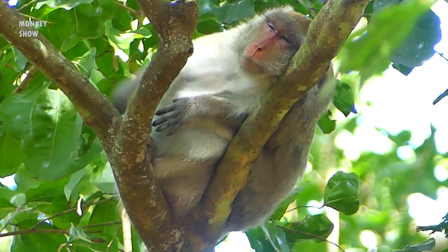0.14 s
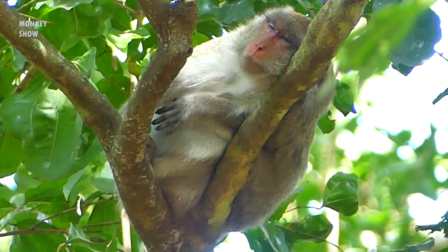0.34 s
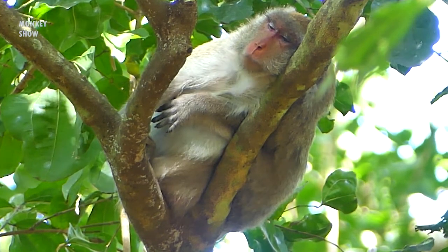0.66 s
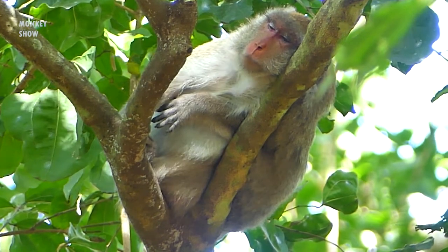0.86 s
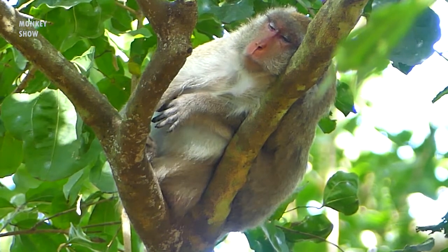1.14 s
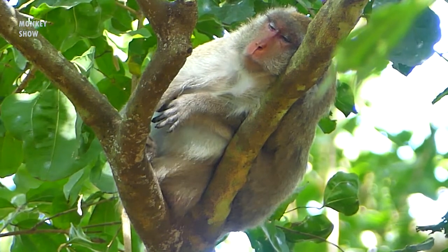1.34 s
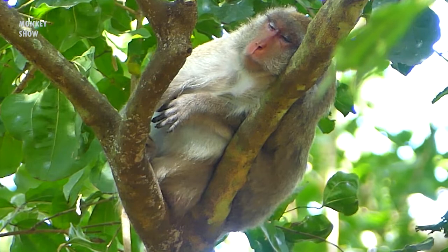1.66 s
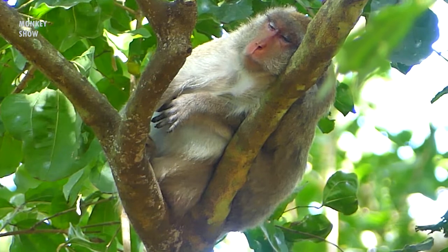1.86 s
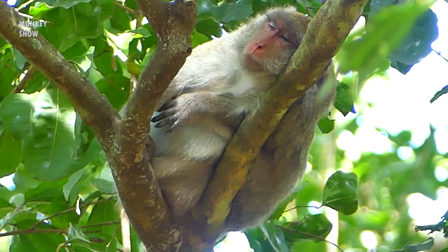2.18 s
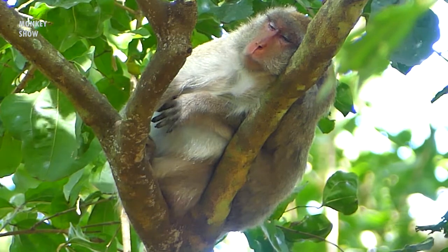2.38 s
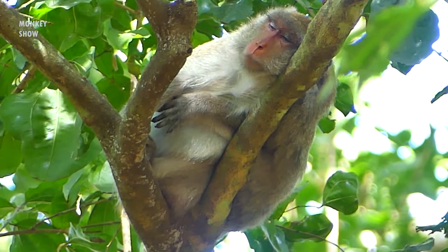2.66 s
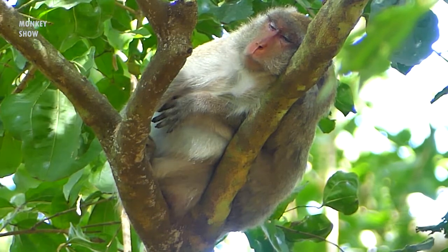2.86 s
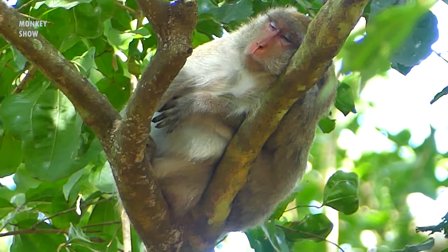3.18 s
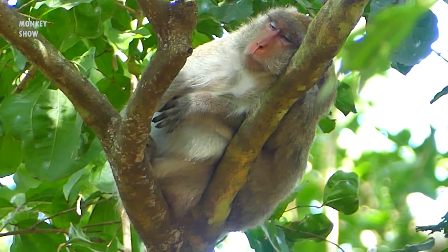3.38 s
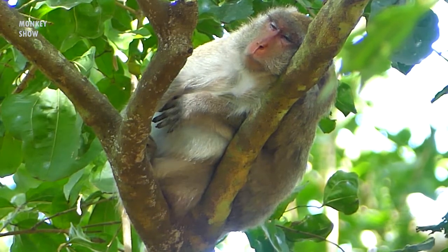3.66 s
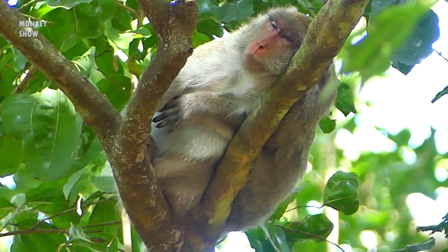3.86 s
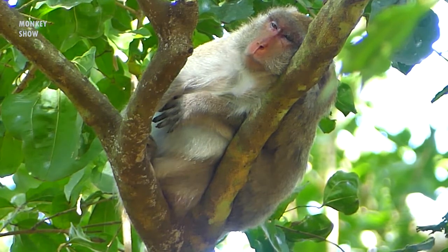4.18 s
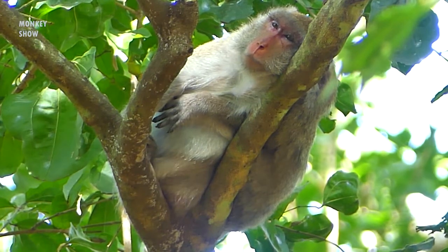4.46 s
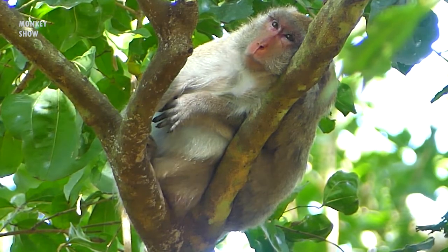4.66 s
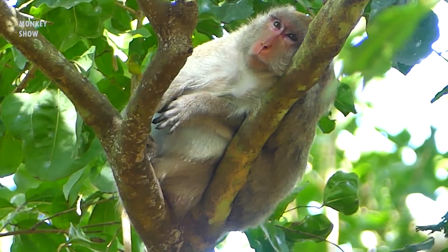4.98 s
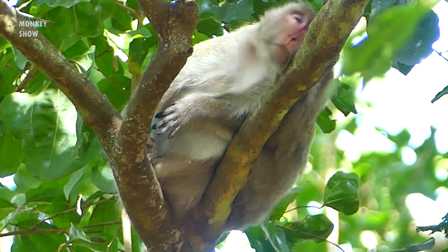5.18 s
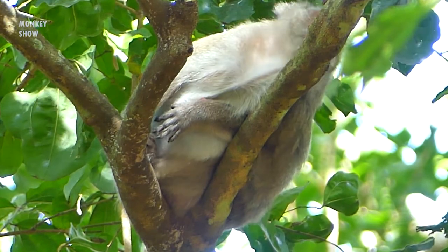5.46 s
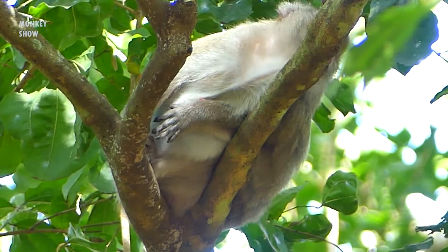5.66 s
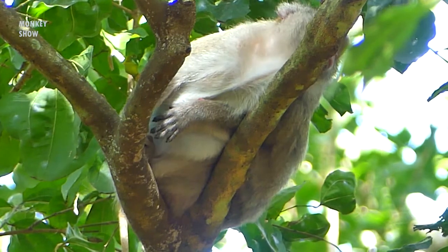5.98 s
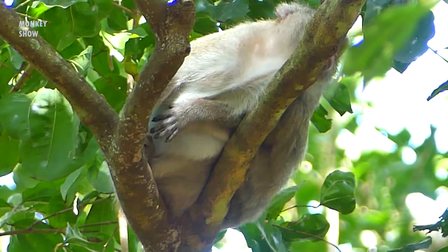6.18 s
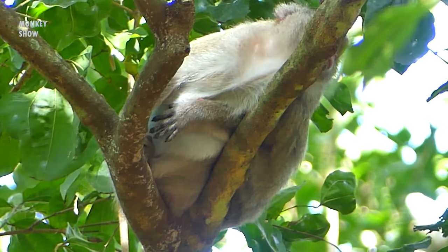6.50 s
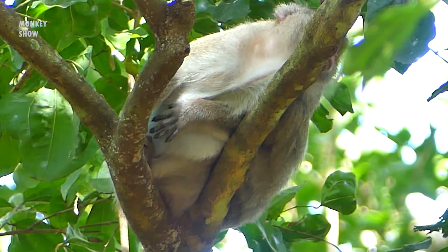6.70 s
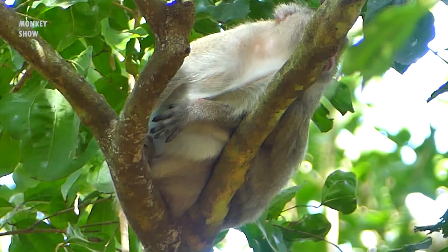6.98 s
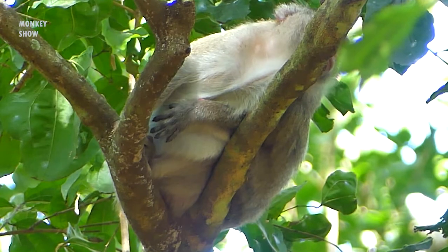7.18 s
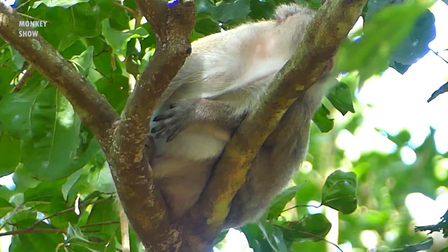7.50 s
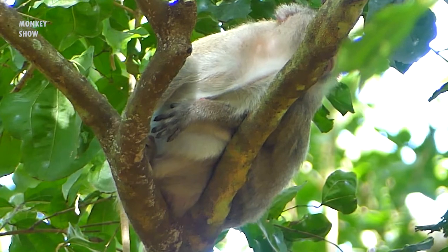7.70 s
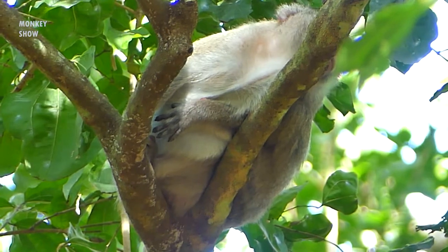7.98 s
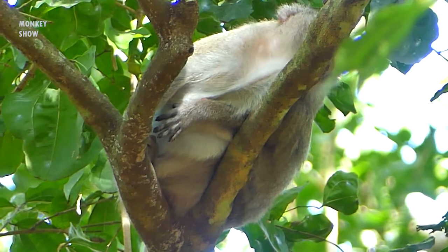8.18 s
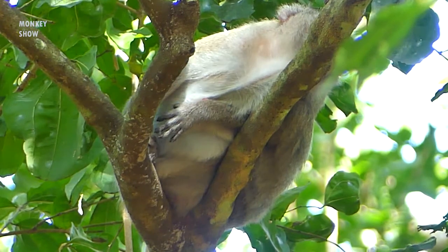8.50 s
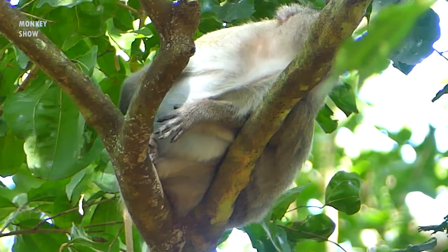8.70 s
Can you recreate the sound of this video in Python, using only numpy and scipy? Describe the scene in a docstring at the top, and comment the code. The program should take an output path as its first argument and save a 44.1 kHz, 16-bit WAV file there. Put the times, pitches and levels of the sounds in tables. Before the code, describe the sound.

Many small woodland birds chirp, squeal and whistle in a dense flurry, then thin out over a steady leafy rush and hiss.

```python
"""A leafy wood, where foliage and far surroundings rush and hiss from start to end: noise in bands that waver.
Falling whistles and a yelp open; nasal calls, churrs, squeals, rising whistles and peeps crowd in after them.
Level whistles and hoarse buzzes join later, then three sharp chips close by, and the calls thin out.
Each kind of call has one pitch gesture and one voice: a stack of partials with rasp, or a nearly pure tone.
Trunks and leaves scatter every note into a long tail; faint far birds and soft swells lie behind."""
import sys
import numpy as np
from scipy import signal
from scipy.fft import rfft, irfft, next_fast_len
from scipy.io import wavfile
from scipy.ndimage import map_coordinates

SR = 44100
rng = np.random.default_rng(int(sys.argv[2]) if len(sys.argv) > 2 else 0)


def file_out(sig):
    """Save sig as 16-bit WAV at sys.argv[1]."""
    # one column per channel
    cols = np.atleast_2d(sig).T
    # limit, then scale
    lim = np.clip(cols, -1, 1)
    pcm = np.round(lim * 32767).astype(np.int16)
    wavfile.write(sys.argv[1], SR, pcm)


N = 389844
TIME = np.arange(N) / SR  # seconds
TOP_HZ = 15650  # no partials, and almost no sound, above this
BRIGHT_HZ = 7500  # a squeal's overtones are lifted above this
WOOD_T60_S, WOOD_TREBLE_T60_S = 1.8, 1.0  # time for the tail to fall by 60 dB
WOOD_BUILD_S = 0.024  # how slowly the scattered sound builds up
UPSLUR_CURVE = 1.7  # above 1, a rising whistle speeds up towards its top
# roughness of the voices: 0 is smooth, 1 is very hoarse
NASAL_ROUGH, UPSLUR_ROUGH, PEEP_ROUGH, YELP_ROUGH, HELD_ROUGH = 0.33, 0.3, 0.34, 0.36, 0.14

# background levels before each layer's trim: t/s, low/dB, middle/dB, hiss/dB
BACKGROUND_LEVELS = [(0.0, -60.5, -49, -57.5), (0.86, -56.5, -51.5, -57), (1.01, -55, -49, -57),
                     (2.26, -56.5, -49, -57), (2.439, -57.5, -49.5, -56), (3.08, -58, -54.5, -59),
                     (3.489, -61, -51.5, -60.5), (4.65, -59.5, -52.5, -59.5), (5.54, -59.5, -53, -61.5),
                     (6.08, -60.5, -52.5, -59), (6.451, -59, -55.5, -62.5), (7.24, -59.5, -51.5, -61),
                     (8.08, -59.5, -53.5, -63.5), (8.84, -59.5, -55.5, -61)]
# relative spectrum of the background rush: f/Hz, level/dB
AIR_SPECTRUM = [(25, -43), (50, -46), (70, -24), (100, -9.5), (145, 0), (220, -1.5), (330, -3), (640, 2),
                (1200, 2), (1600, 0), (2100, -3), (3200, -0.5), (3900, -0.5), (4600, 1), (5400, -0.5),
                (6500, -2.5)]
# relative spectrum of the treble hiss: f/Hz, level/dB
HISS_SPECTRUM = [(5500, -16.5), (6500, 9), (7500, -7), (8500, 0), (10200, 5.5), (11500, 0.5), (13000, -6),
                 (15500, -13)]
# edges of the low background bands that waver separately: f/Hz
LOW_EDGES = [20, 220, 480]
# the same for the middle bands: f/Hz
MIDDLE_EDGES = [480, 850, 1300, 1900]
# the same for the leaves: f/Hz
LEAVES_EDGES = [1900, 3000, 4600, 7000]
# filter for the stereo difference of the background: f/Hz, gain/dB
WIDTH_SPECTRUM = [(30, -5), (70, -10), (130, -22), (500, -17.5), (1400, -23), (6800, -24.5), (8200, -10),
                  (14000, -5)]
# far swells: t/s, length/s, centre f/Hz, width/Hz, level before the swell shape/dB
FAR_SWELLS = [(-.1, 0.98, 560, 250, -53), (3.314, 0.5, 1390, 390, -51.5), (5.727, 0.65, 704, 243, -51.5),
              (6.74, 0.8, 245, 121, -58)]
# how strongly leaves scatter; low notes pass them by: f/Hz, gain/dB
LEAF_SCATTER = [(1900, -3.5), (3000, 0.5), (5000, 4.5), (6500, 2.5), (8200, 9.5), (11000, 1.5)]
# loudness of a whistle as it glides through the beak's resonance: f/Hz, gain/dB
BEAK_RESONANCE = [(4200, 0.5), (4900, -3), (5500, 3.5), (6200, 5), (7000, 2.5)]
# relative strength of the chirps' overtones: f/Hz, gain/dB
OVERTONE_SPECTRUM = [(900, -4), (1400, -8), (1900, 6.5), (2800, 6.5), (4500, 8), (6500, 6.5), (7600, -4),
                     (8500, -6), (10000, -3), (14000, -21)]
# relative spectrum of the rasp in chirps: f/Hz, gain/dB
RASP_SPECTRUM = [(700, -32), (1000, -18), (1500, 0.5), (1900, 3.5), (3300, 9.5), (5000, -2), (6500, -34),
                 (7800, -46), (10500, -39), (15000, -46)]

# Pitch gestures, evenly spaced along the note. Column: offset/semitones
FAR_GESTURE = [0.51, 0.052, -0.3]
# yelp: offset/semitones
YELP_GESTURE = [-1.19, 0.84, 0.15, -0.94, -2.0]
# churr: offset/semitones
CHURR_GESTURE = [-2, -0.3, 0.5, -4.5]
# squeal: offset/semitones
SQUEAL_GESTURE = [-0.096, -0.034, 0.22]
# breaking squeal: offset/semitones
BREAK_GESTURE = [-1.5, 1.1, -2, -6.5, -7.5, -10]
# peep: offset/semitones
PEEP_GESTURE = [0.1, 0.15, -0.4]
# level whistle and buzz: offset/semitones
HELD_GESTURE = [0.14, -0.041, -0.061]
# falling whistle at start, middle and end: f/Hz
DOWNSLUR_PITCHES = [7130, 6340, 5710]
# chip, a quick dip: f/Hz
CHIP_PITCHES = [7460, 5390, 5660, 6300]

# Calls. Scattered levels are taken before LEAF_SCATTER colours them.
# buzzy falling whistles: t/s, length/s, direct/dB, scattered/dB
DOWNSLUR_CALLS = [(0.209, 0.04, -48, -37), (0.315, 0.11, -48.5, -41), (1.715, 0.032, -40, -38),
                  (1.813, 0.064, -46, -47), (2.585, 0.038, -37.5, -38), (3.514, 0.026, -43, -40.5),
                  (5.875, 0.086, -45.5, -40.5), (5.944, 0.023, -39, -41)]
# arched yelps, levels before they grow: t/s, length/s, f/Hz, throat f/Hz, direct/dB, scattered/dB
YELP_CALLS = [(0.371, 0.044, 1768, 3560, -33, -40), (1.151, 0.025, 1772, 5450, -51, -44.5),
              (4.441, 0.019, 1623, 3480, -45, -49)]
# nasal calls: t/s, length/s, f/Hz, fall/semitones, throat f/Hz, overtones/dB, direct/dB, scattered/dB
NASAL_CALLS = [ (0.768, 0.086, 930, 1.5, 2800, -7.5, -35.5, -37),
               (0.789, 0.026, 1382, 0.19, 4230, 2, -35, -36.5),
               (0.908, 0.028, 918, 0.058, 4700, -6, -42, -53),
               (1.526, 0.034, 962, 1.35, 2900, -5, -37, -39.5),
               (1.553, 0.041, 954, 0.44, 1890, -4, -38, -41), (1.59, 0.03, 962, 1, 1900, -5, -35.5, -36),
               (1.632, 0.041, 926, 1.33, 2630, -4, -38, -36),
               (1.691, 0.039, 922, 1.06, 3600, -15, -35.5, -40.5),
               (1.872, 0.0326, 1025, -0.8, 3000, -15, -35, -42.5),
               (2.418, 0.04, 970, 1.5, 2980, -13, -35.5, -39.5),
               (2.45, 0.042, 937, 0.6, 1890, 9, -35.5, -37.5),
               (2.506, 0.043, 921, 1.5, 2740, -10, -39, -36),
               (2.546, 0.041, 927, 0.98, 4700, -24, -41, -43),
               (4.362, 0.079, 1427, -0.14, 2830, -11, -46, -46),
               (4.9, 0.058, 1460, 1.1, 4350, -18, -52, -59),
               (5.199, 0.0403, 1297, 1.04, 3900, -17, -44, -44.5),
               (5.759, 0.031, 900, 0.21, 2700, -5, -46.5, -46),
               (6.608, 0.036, 947, 1.2, 3640, -6, -47, -44.5),
               (7.335, 0.093, 726, 0.69, 2170, -15, -56, -60),
               (7.967, 0.15, 793, -0.76, 3080, -7, -52.5, -62), ]
# harsh churrs, quick arched strokes: t/s, length/s, f/Hz, throat f/Hz, direct/dB, scattered/dB
CHURR_CALLS = [ (0.83, 0.03, 1146, 5000, -38.5, -38), (1.305, 0.029, 1104, 3230, -35.5, -34.5),
               (1.333, 0.02, 1118, 3350, -36.5, -40), (1.921, 0.028, 1133, 3450, -42, -44),
               (2.028, 0.028, 1187, 2400, -41.5, -49), (2.056, 0.047, 1102, 3180, -35.5, -40),
               (2.087, 0.02, 1061, 3000, -36, -35), (2.106, 0.023, 1103, 3400, -39.5, -35),
               (2.151, .044, 1045, 2000, -41.5, -46), (2.161, 0.019, 1100, 3530, -39, -34.5),
               (2.22, 0.018, 1290, 4000, -43, -44), (3.594, 0.051, 1171, 3680, -46, -40.5),
               (4.12, 0.053, 1132, 3430, -45, -43), (5.998, 0.056, 1277, 3920, -49, -45),
               (6.854, 0.1, 1080, 4060, -49.5, -61), (7.038, 0.11, 1030, 3350, -53, -50.5), ]
# thin squeals, levels before they grow: t/s, length/s, f/Hz, overtones/dB, direct/dB, scattered/dB
SQUEAL_CALLS = [(1.009, 0.059, 1605, -22.5, -29, -43.5), (1.063, 0.0153, 1630, -24, -29.5, -42)]
# squeals that break downwards: t/s, length/s, f/Hz, direct/dB
BREAK_CALLS = [(1.069, .033, 1557, -36.5), (1.123, .058, 1676, -34)]
# rising whistles: t/s, length/s, start f/Hz, top f/Hz, direct/dB, scattered/dB
UPSLUR_CALLS = [ (1.454, 0.12, 4420, 6870, -42, -46), (2.4, 0.14, 4450, 6990, -43, -42.5),
                (3.355, 0.11, 4345, 6910, -44.5, -40.5), (3.737, 0.033, 5200, 5750, -46.5, -49),
                (3.997, 0.05, 5200, 5840, -49, -57), (4.191, 0.134, 4350, 7050, -51, -56),
                (4.267, 0.028, 5270, 5620, -44, -56), (4.51, 0.075, 4560, 6940, -46.5, -50),
                (4.974, 0.128, 4210, 6850, -42.5, -43), ]
# peeps: t/s, length/s, f/Hz, direct/dB, scattered/dB
PEEP_CALLS = [ (1.899, 0.039, 1180, -39.5, -43), (2.577, 0.045, 1178, -35.5, -37),
              (2.655, 0.023, 1115, -36, -38.5), (2.854, 0.052, 1099, -39, -42),
              (3.349, 0.076, 1106, -38.5, -46), (4.887, 0.061, 1113, -42, -47.5),
              (5.167, 0.047, 1128, -41, -48), (6.739, 0.09, 1023, -54, -61), (8.661, 0.033, 1122, -53, -65),
              (8.763, 0.065, 1076, -60, -65), ]
# level whistles: t/s, length/s, f/Hz, direct/dB, scattered/dB
HELD_CALLS = [ (2.845, 0.029, 4380, -51, -44.5), (3.367, 0.18, 6720, -43.5, -57),
              (3.525, 0.05, 5810, -36, -47), (3.585, 0.19, 5800, -46, -56), (3.67, 0.2, 4206, -45, -54),
              (3.765, 0.06, 5750, -48, -60), (3.825, 0.25, 4200, -51, -59), (3.807, 0.039, 3040, -48, -49),
              (3.828, 0.3, 2865, -50.5, -53.5), (4.15, 0.34, 3630, -67, -58.5),
              (7.4, 0.215, 2194, -63, -58.5), (7.36, 0.082, 4120, -59, -66),
              (7.39, 0.18, 3630, -58.5, -68.5), (7.678, 0.08, 4380, -58, -58), (8.3, 0.071, 4310, -62, -67),
              ]
# hoarse buzzes farther off: t/s, length/s, f/Hz, direct/dB
BUZZ_CALLS = [(2.868, 0.11, 5600, -53), (3.07, 0.072, 5860, -53), (5.174, 0.06, 5120, -55),
              (5.775, 0.029, 3980, -57), (5.798, 0.064, 5740, -46.5), (5.827, 0.039, 4570, -50),
              (7.877, 0.1, 4730, -58.5), (7.907, 0.066, 5620, -55), (7.926, 0.14, 6250, -58)]
# sharp chips close by: t/s, length/s, direct/dB, scattered/dB
CHIP_CALLS = [(6.139, 0.013, -33, -39), (6.349, 0.012, -33, -37), (6.625, 0.017, -36.5, -39.5)]


def undb(db):
    """Turn decibels into a gain."""
    return 10 ** (np.asarray(db) / 20)


def unit(x):
    """Scale to an average (rms) level of 1."""
    return x / np.sqrt(np.mean(x ** 2))


def gain_at(hz, points):
    """Read the gain from a spectrum of (f/Hz, level/dB) points, joined on a log axis."""
    f, db = np.transpose(points)
    return undb(np.interp(np.log(np.maximum(hz, 1)), np.log(f), db))


def colour(x, points):
    """Filter a sound by a spectrum of (f/Hz, level/dB) points."""
    size = next_fast_len(len(x), True)
    gain = gain_at(np.fft.rfftfreq(size, 1 / SR), points)
    return irfft(rfft(x, size) * gain, size)[:len(x)]


def bandpass(x, order, edges):
    """Keep only what lies between two frequencies."""
    return signal.sosfilt(signal.butter(order, edges, "band", fs=SR, output="sos"), x)


def walk(t, rate):
    """Wander smoothly at random with a spread near 1, passing about rate random points a second."""
    knots = rng.standard_normal(4096)
    return map_coordinates(knots, [t * rate], order=3, mode="wrap")


def background(low_db=2, middle_db=0.5, leaves_db=-48.5, hiss_db=6.0,
               flicker_db=1.5, leaves_flicker_db=2.0, flicker_rate=9):
    """Far rumble, canopy rush and fine hiss, all from noise; the bands below the hiss waver on their own."""
    s, *columns = np.transpose(BACKGROUND_LEVELS)
    low, middle, hiss = (np.interp(TIME, s, c) for c in columns)
    # leaves follow the hiss and end at leaves_db
    leaves = leaves_db + (hiss - hiss[-1])
    out = undb(hiss + hiss_db) * unit(colour(rng.standard_normal(N), HISS_SPECTRUM))
    layers = (
        (LOW_EDGES, low + low_db, flicker_db),
        (MIDDLE_EDGES, middle + middle_db, flicker_db),
        (LEAVES_EDGES, leaves, leaves_flicker_db),
    )
    for edges, db, depth_db in layers:
        rush = 0
        for band in zip(edges, edges[1:]):
            noise = bandpass(rng.standard_normal(N), 5, band)
            rush = rush + noise * undb(depth_db * walk(TIME, flicker_rate))
        out = out + unit(colour(rush, AIR_SPECTRUM)) * undb(db)
    return out


def swells():
    """Far sounds, smeared by distance into soft narrow bands of noise that rise and sink."""
    out = np.zeros(N)
    for start, length, hz, width, db in FAR_SWELLS:
        band = bandpass(rng.standard_normal(N), 2, [hz - width / 2, hz + width / 2])
        shape = np.sin(np.pi * np.clip((TIME - start) / length, 0, 1))
        out += undb(db) * unit(band) * shape
    return out


def bend(hz, semitones):
    """Lay a pitch gesture on a note's pitch."""
    return hz * 2 ** (np.array(semitones) / 12)


def add(paths, start, note, direct_db, scattered_db):
    """Send a note along the straight path (row 0) and into the trees (row 1)."""
    i = max(int(start * SR), 0)
    note = note[..., :N - i]
    paths[:, i:i + note.shape[-1]] += undb([[direct_db], [scattered_db]]) * note


def syrinx(length, pitches, rough, attack_s=0.0027, release_s=0.0031):
    """Make a note's phase, pitch and loudness: pitch glides and wavers, and a rough note flutters more."""
    jitter, jitter_rate = 0.05, 600  # quick pitch wander at roughness 1, in random points a second
    waver, waver_rate = 0.01196, 110  # the same for the slower wander
    shimmer_db = 4  # loudness flutter at roughness 1
    t = np.arange(int(length * SR)) / SR
    unsteady = jitter * rough * walk(t, jitter_rate)
    unsteady = unsteady + waver * np.sqrt(abs(rough)) * walk(t, waver_rate)
    # a smooth curve through all the pitches
    knots = np.linspace(0, 1, len(pitches))
    glide = np.polyval(np.polyfit(knots, pitches, len(knots) - 1), t / length)
    hz = glide * (1 + unsteady)
    # attack and release hold for a 0.19 s note: longer notes swell more gently, shorter ones faster
    ease = np.sqrt(length / 0.19)
    edges = np.clip(np.minimum(t / attack_s, (length - t) / release_s) / ease, 0, 1)
    shimmer = shimmer_db * np.sqrt(abs(rough)) * np.tanh(walk(t, jitter_rate / 2))
    pressure = np.sin(np.pi / 2 * edges) ** 2 * undb(shimmer)
    return 2 * np.pi * np.cumsum(hz) / SR, hz, pressure


def whistle(length, pitches, rough, fade_db=0, flutter_db=3.5, attack_s=0.0013, release_s=0.003):
    """A nearly pure note with a faint octave, shaped by the beak; it flutters and may fade."""
    phase, hz, pressure = syrinx(length, pitches, rough, attack_s, release_s)
    t = np.arange(len(phase)) / SR
    flutter = flutter_db * walk(t, 60)
    pressure = pressure * gain_at(hz, BEAK_RESONANCE) * undb(flutter - fade_db * t / length)
    octave = undb(-30) * np.sin(2 * phase)
    return unit(pressure * (np.sin(phase) + octave))


def far_birds(count=40, far_db=-56, low_hz=2700, high_hz=6300, length_s=0.067,
              scatter_db=3, fade_db_per_s=1):
    """Birds deep in the wood whistle at random, heard only by way of the trees; they slowly quieten."""
    paths = np.zeros((2, N))
    for when, height, size in rng.random((count, 3)):
        start = when * (N / SR - length_s)
        hz = low_hz * (high_hz / low_hz) ** height
        db = far_db + scatter_db * (2 * size - 1) - fade_db_per_s * start
        add(paths, start, whistle(length_s, bend(hz, FAR_GESTURE), rough=0.42), db, db)
    return paths[1]


def wood(x, early_db=3, early_t60_s=0.16, patchy_db=3):
    """Scatter sound: a quick burst from the nearest leaves, then a trunk tail whose treble dies first."""
    t = np.arange(int(1.5 * SR)) / SR

    def fade(t60):
        """Die away by 60 dB in t60 seconds."""
        return np.exp(-np.log(1000) * t / t60)

    echoes = rng.standard_normal(len(t)) * undb(patchy_db * walk(t, 500))
    low = signal.sosfilt(signal.butter(1, 4500, fs=SR, output="sos"), echoes)
    tail = low * fade(WOOD_T60_S) + (echoes - low) * fade(WOOD_TREBLE_T60_S)
    burst = undb(early_db) * echoes * fade(early_t60_s)
    response = (tail + burst) * (1 - np.exp(-t / WOOD_BUILD_S))
    return signal.fftconvolve(x, response / np.linalg.norm(response))[:N]


def falling_whistles(paths):
    """Nearly pure notes glide down; strong roughness makes them buzz."""
    for start, length, direct_db, scattered_db in DOWNSLUR_CALLS:
        add(paths, start, whistle(length, DOWNSLUR_PITCHES, rough=0.59), direct_db, scattered_db)


def chirp(length, pitches, throat_hz, overtones_db, rough, spill_db=0, bright_db=0,
          throat_width_hz=420, rasp_db=-1, attack_s=0.0031):
    """A harmonic note, direct and scattered: the throat lifts partials near it, and roughness adds rasp."""
    phase, hz, pressure = syrinx(length, pitches, rough, attack_s)
    k = np.arange(1, 15)[:, None]  # partial numbers
    partials = np.sin(k * phase + 2 * np.pi * rng.random(k.shape)) * (k * hz < TOP_HZ)
    throat = np.exp(-.5 * ((k * hz - throat_hz) / throat_width_hz) ** 2)
    lifted = np.sum(partials * throat, axis=0)
    tilt = gain_at(k * hz, OVERTONE_SPECTRUM) * undb(bright_db * (k * hz > BRIGHT_HZ))
    overtones = undb(overtones_db) * np.sum(partials * tilt, axis=0)
    # extra overtones spill into the trees only
    voice = (lifted + undb([[0], [spill_db]]) * overtones) / np.std(lifted + overtones)
    # air escapes in one puff per cycle
    puffs = rng.standard_normal(SR)[:len(phase)] * (1 + np.cos(phase))
    rasp = unit(colour(puffs, RASP_SPECTRUM))
    note = pressure * (voice + undb(rasp_db) * rough ** 2 * rasp)
    return note / np.std(note[0])


def crescendo(note, db):
    """Let a note grow by db from its start to its end."""
    return note * undb(db * np.linspace(-.5, .5, note.shape[-1]))


def yelps(paths):
    """Arched notes, rich in overtones, that grow louder."""
    for start, length, hz, throat_hz, direct_db, scattered_db in YELP_CALLS:
        note = chirp(length, bend(hz, YELP_GESTURE), throat_hz, overtones_db=-11,
                     rough=YELP_ROUGH, spill_db=8, attack_s=0.012)
        add(paths, start, crescendo(note, 6), direct_db, scattered_db)


def nasal_calls(paths):
    """Raspy harmonic notes coloured by the throat, each with its own sag in pitch."""
    for start, length, hz, fall, throat_hz, overtones_db, direct_db, scattered_db in NASAL_CALLS:
        sag = fall * np.array([1 / 3, 1 / 6, -2 / 3])
        note = chirp(length, bend(hz, sag), throat_hz, overtones_db,
                     rough=NASAL_ROUGH, rasp_db=7, attack_s=0.011)
        add(paths, start, note, direct_db, scattered_db)


def churrs(paths):
    """Quick arched strokes, made harsh by a rough voice and a wide throat resonance."""
    for start, length, hz, throat_hz, direct_db, scattered_db in CHURR_CALLS:
        note = chirp(length, bend(hz, CHURR_GESTURE), throat_hz, overtones_db=-17,
                     rough=0.76, throat_width_hz=720)
        add(paths, start, note, direct_db, scattered_db)


def squeals(paths):
    """Thin, smooth notes carried by their second partial, growing louder."""
    for start, length, hz, overtones_db, direct_db, scattered_db in SQUEAL_CALLS:
        note = chirp(length, bend(hz, SQUEAL_GESTURE), 2 * hz, overtones_db,
                     rough=0.096, spill_db=15.5, bright_db=2.5, attack_s=0.041)
        add(paths, start, crescendo(note, 5), direct_db, scattered_db)


def breaking_squeals(paths, wet_db=-4):
    """Raspy harmonic notes whose pitch breaks steeply downwards."""
    for start, length, hz, db in BREAK_CALLS:
        note = chirp(length, bend(hz, BREAK_GESTURE), throat_hz=2690, overtones_db=-13,
                     rough=0.535, throat_width_hz=390)
        add(paths, start, note, db, db + wet_db)


def rising_whistles(paths):
    """Nearly pure notes that speed up on the way to the top."""
    for start, length, hz, top_hz, direct_db, scattered_db in UPSLUR_CALLS:
        rise = hz + (top_hz - hz) * np.linspace(0, 1, 3) ** UPSLUR_CURVE
        note = whistle(length, rise, rough=UPSLUR_ROUGH, attack_s=0.0095, release_s=0.011)
        add(paths, start, note, direct_db, scattered_db)


def peeps(paths):
    """Soft-edged harmonic notes carried by their third partial."""
    for start, length, hz, direct_db, scattered_db in PEEP_CALLS:
        note = chirp(length, bend(hz, PEEP_GESTURE), 3 * hz, overtones_db=-20.5,
                     rough=PEEP_ROUGH, attack_s=0.017)
        add(paths, start, note, direct_db, scattered_db)


def level_whistles(paths):
    """Smooth, nearly pure notes that hold their pitch and fade."""
    for start, length, hz, direct_db, scattered_db in HELD_CALLS:
        note = whistle(length, bend(hz, HELD_GESTURE), rough=HELD_ROUGH, fade_db=3,
                       attack_s=0.008, release_s=0.013)
        add(paths, start, note, direct_db, scattered_db)


def buzzes(paths, wet_db=4):
    """Level notes farther off, made hoarse by strong roughness and sent mostly into the trees."""
    for start, length, hz, db in BUZZ_CALLS:
        note = whistle(length, bend(hz, HELD_GESTURE), rough=0.99)
        add(paths, start, note, db, db + wet_db)


def chips(paths, attack_s=0.001, release_s=0.0013):
    """Pure notes that start at once, dip in pitch and come partway back."""
    for start, length, direct_db, scattered_db in CHIP_CALLS:
        phase, _, _ = syrinx(length, CHIP_PITCHES, rough=0.4)
        t = np.arange(len(phase)) / SR
        edges = np.clip(np.minimum(t / attack_s, (length - t) / release_s), 0, 1)
        add(paths, start, unit(np.sin(phase) * edges), direct_db, scattered_db)


def scene(wood_side_db=-22):
    """The birds sit near the centre; the background spreads widest in its deep rumble and high hiss."""
    paths = np.zeros((2, N))
    for calls in (falling_whistles, yelps, nasal_calls, churrs, squeals, breaking_squeals,
                  rising_whistles, peeps, level_whistles, buzzes, chips):
        calls(paths)
    direct, scattered = paths
    scattered = colour(scattered + far_birds(), LEAF_SCATTER)
    mid = direct + wood(scattered) + background() + swells()
    side = colour(background(), WIDTH_SPECTRUM) + undb(wood_side_db) * wood(scattered)
    return np.array([mid + side, mid - side])


def record(dry):
    """Cut the top steeply with a low-pass filter."""
    return signal.sosfilt(signal.ellip(10, .1, 80, TOP_HZ, fs=SR, output="sos"), dry)


dry = scene()
out = record(dry)
file_out(out)
```